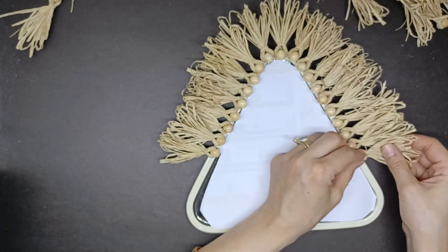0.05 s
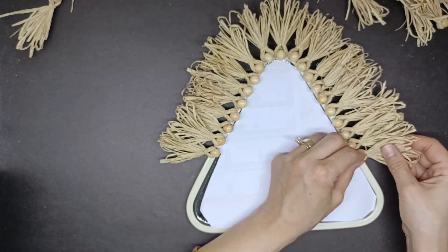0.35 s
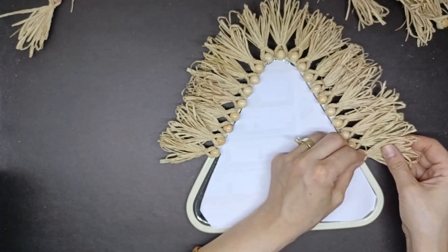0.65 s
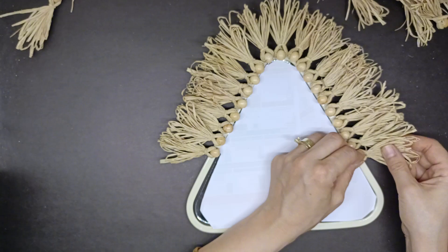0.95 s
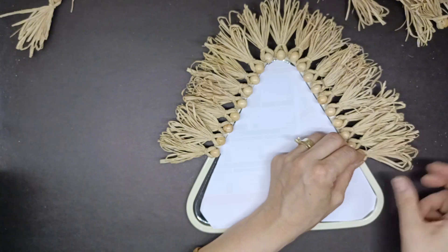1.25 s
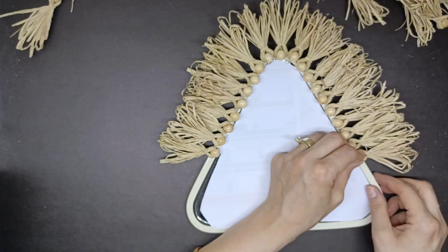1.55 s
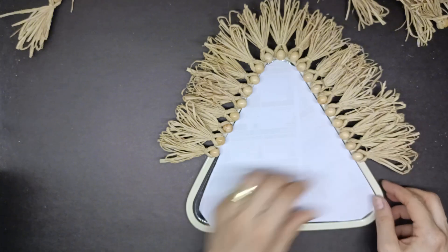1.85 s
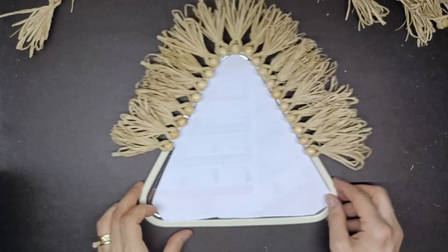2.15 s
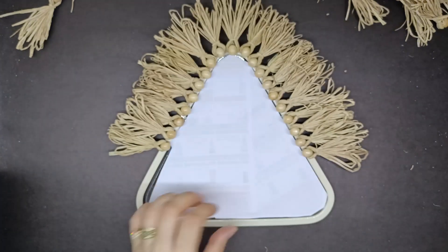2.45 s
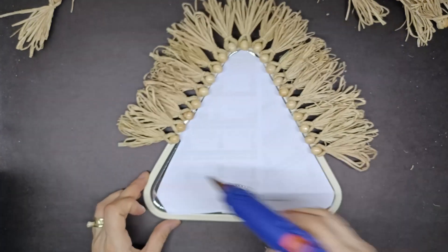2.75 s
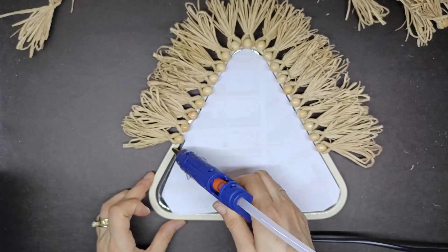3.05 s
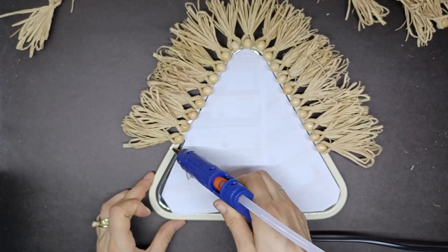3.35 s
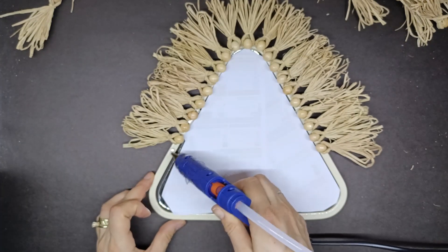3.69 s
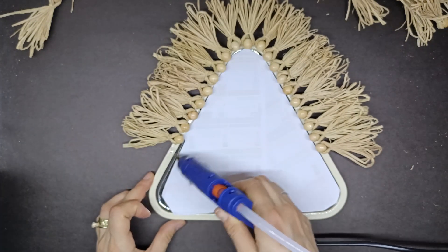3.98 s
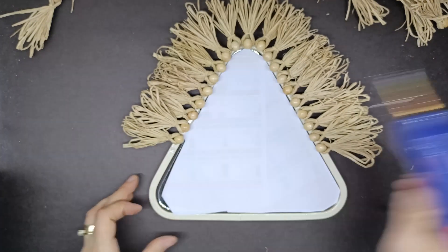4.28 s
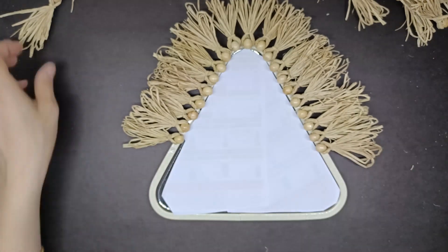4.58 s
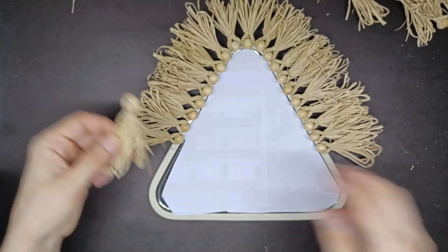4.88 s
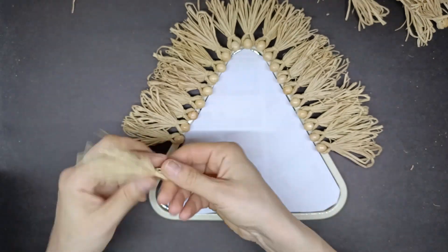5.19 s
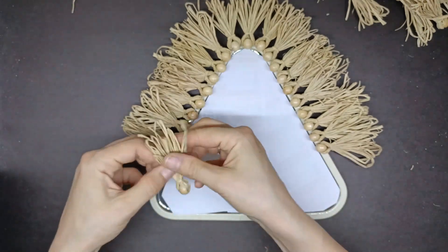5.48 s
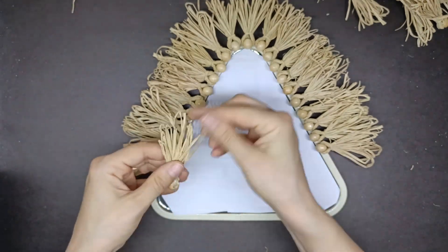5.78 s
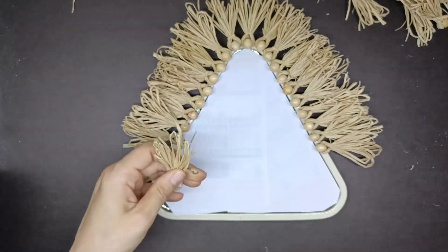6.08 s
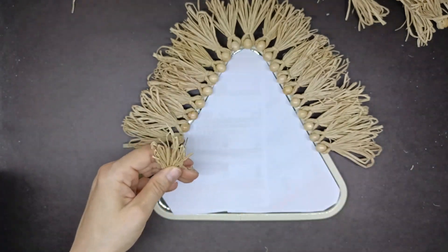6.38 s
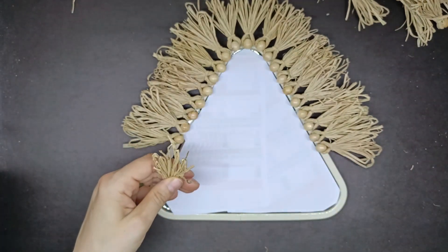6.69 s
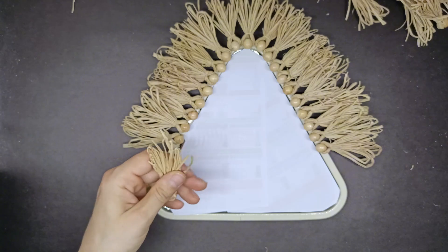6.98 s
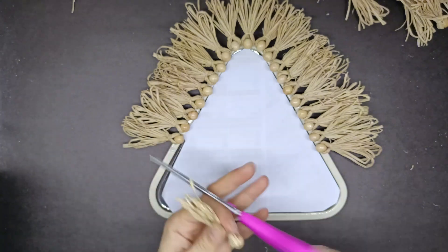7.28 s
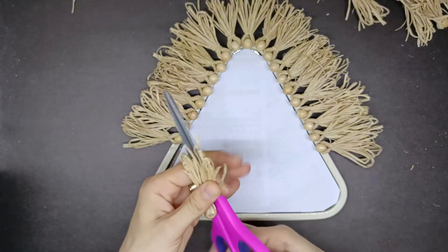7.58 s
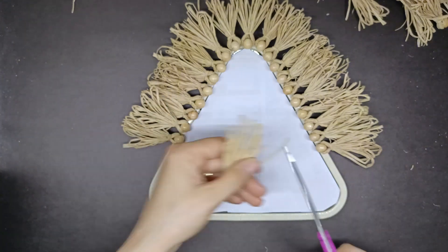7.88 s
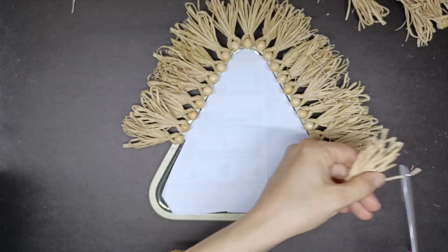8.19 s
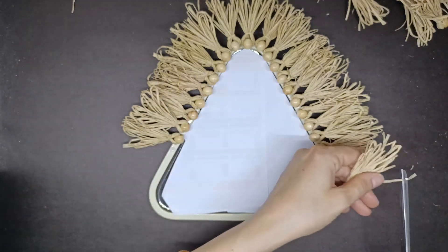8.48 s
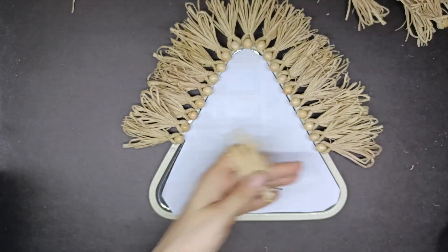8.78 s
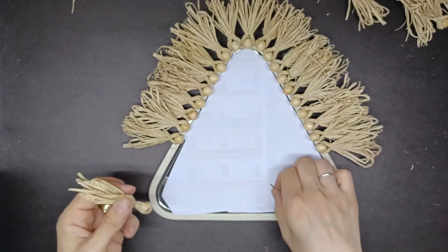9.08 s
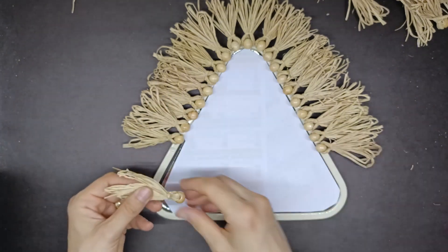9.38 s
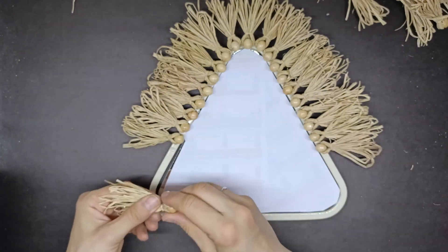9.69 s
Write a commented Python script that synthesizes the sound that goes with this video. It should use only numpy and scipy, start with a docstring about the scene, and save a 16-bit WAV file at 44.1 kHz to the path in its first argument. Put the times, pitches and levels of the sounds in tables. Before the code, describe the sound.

In a small, quiet room with a low rumble, raffia rustles briefly and a frame scrapes across a table. A glue gun is picked up with clicks and put down with a knock. Fingers then fluff a dry raffia tassel, with a crisp hiss and tiny snaps. Near the end scissors make one bright snip and land with a loud clatter, followed by more soft rustling. Everything sounds close.

```python
"""At a work table in a small, quiet room with a low rumble. Hands slide a frame, use a glue gun and
put it down, then fluff and trim a dry raffia tassel. The scissors land with a clatter near the end.
Fibres rub and snap in tiny grains; small hard parts click. Things dragged or dropped on the table
ring the modes of its top."""
import sys
import numpy as np
from scipy import signal
from scipy.fft import rfft, irfft
from scipy.io import wavfile

SR = 44100
rng = np.random.default_rng(int(sys.argv[2]) if len(sys.argv) > 2 else 0)


def put_to_file(sound):
    """Save the sound as 16-bit audio at rate SR, in the file named by the first command-line argument."""
    columns = np.atleast_2d(sound).T  # one column per channel
    safe = np.clip(columns, -1, 1)
    whole_steps = np.round(safe * 32767)
    wavfile.write(sys.argv[1], SR, whole_steps.astype(np.int16))


N = 434385
TIME_S = np.arange(N) / SR

# Single fibres snapping. Each row: time in seconds, level in dB.
FIBRE_SNAPS = [(0.235, -45.5), (0.247, -60), (0.406, -66), (0.7114, -59), (2.481, -65.5), (2.913, -46.5),
               (3.007, -49.5), (3.051, -54.5), (3.9054, -60), (4.8316, -41.5), (4.9277, -43.5),
               (5.049, -47), (5.2148, -41), (5.3282, -44), (5.3796, -56), (5.6952, -45.5), (5.767, -42.5),
               (6.0073, -44), (6.0685, -43), (6.136, -51), (6.2277, -46), (6.406, -53.5), (7.1032, -51.5),
               (7.1748, -53), (7.205, -48.5), (7.788, -49), (7.94, -58.5), (8.264, -67.5), (8.3198, -63),
               (8.372, -69), (8.7271, -44), (9.085, -61.5), (9.338, -45), (9.4659, -49.5), (9.8026, -46)]
# Glue gun, beads and scissors. Each row: start in seconds, level in dB, main resonance in Hz.
PART_CLICKS = [(0.357, -73, 3090), (2.0566, -46, 2950), (3.008, -66.5, 2300), (3.6058, -73.5, 1157),
               (3.807, -66, 1200), (3.958, -51.5, 1166), (4.118, -69.5, 1160), (4.166, -66.5, 2450),
               (4.7674, -47, 1560), (6.9054, -45.5, 1605), (7.431, -69, 2630), (7.8394, -69.5, 1176)]
# Small hard parts. Each row: multiple of the main resonance, level in dB, T60 in seconds.
PART_MODES = [(1, 8, 0.038), (2.06, -11, 0.097), (2.8, -15, 0.06), (3.7, -20, 0.046)]
# Fingers pushing through raffia. Each row: peak time, rise and fall in seconds, fibre hiss in dB,
# bundle rustle in dB re hiss.
RAFFIA_STROKES = [(1.22, 0.045, 0.091, -52.5, -4.5), (4.02, 0.077, .08, -74.5, -15),
                  (4.265, 0.012, 0.047, -73.5, 7.5), (4.79, 0.034, 0.064, -49, 2.5),
                  (4.838, 0.02, 0.046, -43, -5), (4.93, 0.054, 0.048, -53, -12.5),
                  (5.055, 0.095, 0.072, -62, -12.5), (5.148, 0.033, 0.04, -45, -18),
                  (5.3, 0.048, 0.062, -50.5, -13.5), (5.452, 0.046, 0.04, -45, -18),
                  (5.54, 0.051, 0.068, -43.5, -22), (5.62, 0.041, 0.057, -41, -18.5),
                  (5.655, 0.043, 0.023, -44.5, -7), (5.71, .04, 0.04, -48, -19.5),
                  (5.775, 0.041, 0.11, -50.5, -15.5), (5.87, 0.092, 0.047, -54, -12),
                  (6.04, 0.052, 0.085, -50, -11.5), (6.145, 0.038, 0.054, -58, -11),
                  (6.22, 0.039, 0.064, -56.5, -14), (6.3, .05, 0.11, -66, -6.5),
                  (7.045, 0.023, 0.039, -57, -17), (7.1, .04, 0.042, -61.5, -10),
                  (7.185, 0.061, 0.15, -67.5, 3), (7.428, 0.026, 0.028, -55, -3),
                  (7.6, 0.077, 0.043, -66.5, -12.5), (7.725, 0.037, 0.067, -64, -13),
                  (7.79, 0.045, 0.047, -64.5, -9.5), (7.845, 0.023, 0.022, -51, -6.5),
                  (8.77, .12, .14, -59, -16.5), (9.28, 0.1, 0.043, -55.5, -10.5),
                  (9.358, 0.031, 0.037, -47, -9), (9.42, 0.042, 0.029, -45, -19.5),
                  (9.53, 0.058, .08, -55, -11), (9.65, 0.085, 0.12, -50.5, -17),
                  (9.81, 0.033, 0.067, -52, -13)]
# Frame shoved, glue gun drawn off and pushed back, scissors picked up and laid down. Each row: peak
# time, rise and fall in seconds, scrape in dB, then board, panel and hiss in dB re scrape.
FRAME_STROKES = [(1.82, .035, 0.042, -79, 23.5, 2, 10), (1.87, 0.035, 0.019, -68, 4, -6, 0),
                 (1.98, .13, .17, -67.5, -3, -6.5, 5.5), (2.09, 0.059, .06, -52.5, 1.5, -13, -11),
                 (2.175, 0.13, 0.096, -42.5, -7, -13.5, -0.5), (2.235, 0.1, 0.057, -50.5, 5, -6, 1)]
GUN_STROKES = [(2.55, 0.018, .03, -53.5, -13, -8, -8), (2.585, .02, 0.027, -53.5, -6.5, -6, -5.5),
               (2.66, .035, .06, -50.5, -13, -5.5, -11), (2.72, 0.041, .08, -40.5, -25, -9, -15),
               (2.8, 0.089, .16, -51, -7.5, -3, -4), (2.89, 0.032, .08, -61, 5, 2.5, -2),
               (4.345, 0.044, .05, -54, 3.5, 4, -10.5), (4.385, 0.039, .06, -60.5, -0.5, -11, -8),
               (4.487, 0.045, .035, -49, 5.5, 2.5, -18), (4.56, .03, .05, -54, 5, -4.5, -7.5),
               (4.612, 0.057, .05, -51, -3.5, -9, -9.5), (4.65, 0.021, .045, -68.5, 17.5, 3, -27)]
SCISSOR_STROKES = [(6.41, .11, 0.11, -73, 5.5, 9, -4.5), (6.775, 0.05, 0.049, -78.5, 7.5, 14, -13),
                   (6.82, 0.029, .04, -53.5, -1.5, 2.5, -26), (6.86, 0.031, 0.046, -41.5, -24, -17.5, -6),
                   (6.915, 0.035, 0.074, -49, -15.5, -5.5, -11),
                   (8.872, .025, 0.045, -39.5, 2.5, -5.5, -3.5), (8.937, 0.028, 0.044, -37.5, 6.5, 7, -5),
                   (8.987, 0.018, .03, -41, 9, 5, -14.5), (9.05, 0.065, 0.067, -71, 13.5, 12, -13)]
# Resonances of the dragged objects. Each row: frequency in Hz, width in Hz, level in dB.
FRAME_BODY = [(1540, 45, -15), (2350, 210, 1.5), (3080, 210, 6), (3520, 150, 2), (3800, 73, 6),
              (4380, 150, 4.5), (5650, 670, -2)]
GUN_BODY = [(1140, 190, 1.5), (1360, 80, -5.5), (2080, 390, -3), (2430, 180, -1), (2910, 300, -4.5),
            (3080, 86, -6.5), (3700, 41, -4.5), (4180, 150, -4)]
SCISSOR_BODY = [(720, 120, -3.5), (1075, 130, 8), (1580, 110, 2.5), (2400, 200, 3.5), (2540, 110, -1.5),
                (2920, 120, -2.5), (3140, 87, -0.5), (3470, 44, -12.5), (4970, 1000, -14.5)]
# Blows on the table. Each row: start in seconds, then crack, table thud, board boom and panel ring
# in dB, bright tick in dB re crack, decay of crack and tick in seconds.
TABLE_KNOCKS = [(1.9026, -60, -73, -62, -65.5, -18, .006), (2.057, -47, -65, -45, -52.5, -25, 0.0015),
                (2.5743, -45, -59, -57, -71, -7, .007), (2.7018, -29, -55.5, -54, -66, -16, 0.0022),
                (2.7503, -38.5, -64, -65, -48.5, -4.5, 0.0062), (4.335, -47.5, -43.5, -64, -43, -35, 0.01),
                (4.4529, -44, -58, -39.5, -41, -30, .007), (4.499, -24, -53, -49, -41, -12, 0.0028),
                (4.5248, -28, -34, -29, -30, -8, 0.0064), (4.641, -59, -52, -63, -59.5, -23, 0.022),
                (6.3576, -54.5, -58.5, -62, -53, -11, 0.0044), (6.475, -59.5, -64, -72.5, -56, -12, 0.0069),
                (8.8655, -29.5, -59, -36, -40, -21, 0.013), (8.917, -18.5, -27, -22.5, -27, -7, 0.0042),
                (8.9339, -25.5, -41, -46, -23.5, -30, 0.0068),
                (8.977, -27.5, -37, -18.5, -18.5, -24, 0.0072), (9.125, -63, -57.5, -49, -72, 3, 0.018)]
# Modes of the whole table, its board and its panel. Each row: frequency in Hz, level in dB,
# T60 in seconds.
TABLE_MODES = [(92, -1, 0.15), (120, -5, .11), (141.7, 1, .11)]
BOARD_MODES = [(163, 2.5, 0.07), (181.6, 2.5, .1), (212.2, -11, .08)]
PANEL_MODES = [(345, -8, .06), (392, -5, .055), (440, -8, .05), (478, 0, .055), (530, -13, .05),
               (675, -8, .05), (830, -12, .045)]
# Noise spectra. Each row: frequency in Hz, relative density in dB.
ROOM_SPECTRUM = [(15, -19), (28, -2.5), (50, -5.5), (80, -6), (105, -16.5), (135, -13), (220, -18),
                 (310, -37.5), (430, -25.5), (620, -36), (1400, -43), (3000, -41.5), (8500, -50),
                 (16000, -48)]
FIBRE_SPECTRUM = [(2500, -30), (4200, -13), (6000, -6.5), (8800, -1), (10200, -2), (12000, 2), (16000, -5)]
BUNDLE_SPECTRUM = [(150, -14.5), (450, -3), (720, -10), (1100, -4), (1550, -9), (1900, -9.5), (2500, -0.5),
                   (3500, -5), (5000, -5), (8000, -12.5)]
SCRAPE_SPECTRUM = [(400, -24), (800, -9), (1050, -5), (1350, -2), (1600, -2.5), (1850, -8.5), (2150, -2.5),
                   (2800, 4.5), (3600, -4), (5000, -5.5), (7000, -13), (12000, -20.5)]
HISS_SPECTRUM = [(3000, -18.5), (5500, 2), (7500, -1.5), (9800, -3), (12000, -3), (16000, -13.5)]
CRACK_SPECTRUM = [(200, -14.5), (350, -3), (650, -2.5), (950, -2), (1300, -1), (1750, -8), (2700, 1.5),
                  (3600, -7), (5000, -8.5), (7500, -22.5), (14000, -34)]
SHEAR_SPECTRUM = [(150, -24), (420, -16), (720, -14.5), (950, -18.5), (1600, -24), (2900, -10.5),
                  (4200, -16.5), (5700, -8), (8400, -4.5), (10800, -1), (13000, -7.5), (16000, -9.5)]


def undb(db):
    """Decibels to gain."""
    return 10 ** (np.asarray(db) / 20)


def pan(db):
    """Stereo gains for a level of left re right."""
    return undb(np.array([[db], [-db]]) / 2)


def add(out, at_s, sound, centred=False):
    """Mix a sound in, starting or centred at at_s."""
    start = int(at_s * SR) - centred * (sound.shape[-1] // 2)
    out[:, start:start + sound.shape[-1]] += sound[..., :N - start]


def highpass(x, hz, order=2):
    """Butterworth high-pass."""
    return signal.sosfilt(signal.butter(order, hz, "high", fs=SR, output="sos"), x)


def convolve(x, response):
    """Stereo convolution, cut to N samples."""
    return signal.oaconvolve(x, response, axes=1)[:, :N]


def colour(x, spectrum, size=8192):
    """Minimum-phase filter with the given spectrum; white noise keeps its power."""
    hz, db = np.transpose(spectrum)
    bins_hz = np.maximum(np.arange(size // 2 + 1) * SR / size, 1)
    gain = undb(np.interp(np.log(bins_hz), np.log(hz), db))
    cepstrum = irfft(np.log(gain))
    cepstrum[1:size // 2] *= 2
    cepstrum[size // 2 + 1:] = 0
    response = irfft(np.exp(rfft(cepstrum)))[:size // 2]
    return convolve(x, response[None] / np.linalg.norm(response))


def stereo_noise(shared_hz):
    """Noise at two microphones: alike for long waves, unrelated for short ones."""
    mid, side = rng.standard_normal((2, N))
    side = highpass(side, shared_hz)
    return np.array([mid + side, mid - side]) / np.sqrt(2)


def room_tone(level_db=-65):
    """Steady low rumble with faint hiss."""
    rumble = colour(stereo_noise(shared_hz=264), ROOM_SPECTRUM)
    return rumble / rumble.std() * undb(level_db)


def burst(rise_s, fall_s, size=8192):
    """One contact, centred in its array: a light brush, then noise that rises fast and dies away."""
    t = TIME_S[:size] - TIME_S[size // 2]
    after_s = np.maximum(t, 0)
    envelope = (1 - np.exp(-after_s / rise_s)) * np.exp(-after_s / max(fall_s, .001))
    brush = undb(-18) * np.exp(-np.abs(t) / .008)
    return (envelope / envelope.max() + brush) * rng.standard_normal((2, size))


def fibre_snaps(strays_per_s=4, stray_db=-65, stray_fall_s=.002):
    """Stiff fibres flick free one at a time; bent ones settle at random with faint ticks."""
    snaps = np.zeros((2, N))
    for at_s, db in FIBRE_SNAPS:
        add(snaps, at_s, undb(db) * burst(rise_s=.001, fall_s=.003), centred=True)
    settling = rng.random(N) < strays_per_s / SR
    spread_db = np.clip(rng.standard_normal(N), -2, 2)
    impulses = settling * undb(stray_db + spread_db)
    envelope = signal.lfilter([1], [1, -np.exp(-1 / (stray_fall_s * SR))], impulses + 1e-18)
    strays = envelope * rng.standard_normal((2, N))
    return colour(snaps + strays, FIBRE_SPECTRUM) * pan(-1.2)


def ring(modes, push_s, detune, apart_hz, size=12000):
    """Damped modes after a push; higher ones reach the two microphones out of step."""
    t, out = TIME_S[:size], 0
    for k, (hz, db, t60_s) in enumerate(modes):
        lag_rad = (-1) ** k * min(hz / apart_hz, 1) * np.array([[1], [-1]])
        phase = 2 * np.pi * hz * (1 + detune * rng.standard_normal()) * t + lag_rad
        out = out + undb(db) * np.exp(-np.log(1000) * t / t60_s) * np.sin(phase)
    out = out * (1 - np.exp(-t / push_s))
    onset_rms = np.sqrt(np.mean(out[:, :size // 20] ** 2))
    return out / onset_rms


def part_clicks():
    """Small hard parts meet with a tick and ring briefly."""
    tone, tick = np.zeros((2, 2, N))
    for at_s, db, hz in PART_CLICKS:
        modes = [(hz * ratio, mode_db, t60_s) for ratio, mode_db, t60_s in PART_MODES]
        add(tone, at_s, undb(db) * ring(modes, push_s=.0018, detune=.0091, apart_hz=2400))
        add(tick, at_s, undb(db + 6) * burst(rise_s=.002, fall_s=.0052), centred=True)
    return tone + colour(tick, SCRAPE_SPECTRUM) + undb(-13) * colour(tick, HISS_SPECTRUM)


def grains(per_s, spread_db, grain_s):
    """Tiny slips of random size, each a brief burst of noise; rms 1."""
    slipping, spread = rng.random(N) < per_s / SR, rng.standard_normal(N)
    sizes = slipping * undb(spread_db * np.clip(spread, -2, 2))
    power = signal.lfilter([1], [1, -np.exp(-2 / (grain_s * SR))], sizes ** 2 + 1e-12)
    return np.sqrt(power / power.mean()) * rng.standard_normal((2, N))


def stroke_gain(strokes, roundness, layer=None, swell_db=21):
    """Each push speeds up and slows in one swell (roundness 2: bell); layer picks a relative dB column."""
    power = np.zeros(N)
    for peak_s, rise_s, fall_s, db, *layers_db in strokes:
        span = slice(*np.searchsorted(TIME_S, [peak_s - 2 * rise_s, peak_s + 2 * fall_s]))
        off_peak = np.maximum((peak_s - TIME_S[span]) / rise_s, (TIME_S[span] - peak_s) / fall_s)
        peak_db = db + (0 if layer is None else layers_db[layer])
        power[span] += undb(peak_db - swell_db * off_peak ** roundness) ** 2
    return np.sqrt(power)


def raffia_rustle(roundness=2.33):
    """Dry fibres slip densely over each other, a few crackle; the squeezed bundle rustles lower."""
    slips = grains(per_s=2500, spread_db=4.2, grain_s=.0013)
    crackle = undb(-6) * grains(per_s=100, spread_db=3.5, grain_s=.0012)
    creases = grains(per_s=2500, spread_db=3, grain_s=.002)
    fibres = slips + crackle
    hiss = colour(fibres / fibres.std(), FIBRE_SPECTRUM) * stroke_gain(RAFFIA_STROKES, roundness)
    bundle = colour(creases, BUNDLE_SPECTRUM) * stroke_gain(RAFFIA_STROKES, roundness, layer=0)
    return hiss * pan(-2) + bundle * pan(-1.9)


def rubbed_modes(modes, shared_hz):
    """Modes kept ringing by friction; rms 1."""
    response = ring(modes, push_s=.0029, detune=.0077, apart_hz=5000)
    out = convolve(stereo_noise(shared_hz), response)
    return out / out.std()


def resonate(x, body):
    """Parallel resonances of an object; white noise keeps its power."""
    t = TIME_S[:2048]
    response = sum(undb(db) * width_hz * np.exp(-np.pi * width_hz * t) * np.cos(2 * np.pi * hz * t)
                   for hz, width_hz, db in body)
    response = highpass(response, hz=600)
    return convolve(x, response[None] / np.linalg.norm(response))


def drags(roundness=1.98):
    """Frame, glue gun and scissors catch and slip on the table, ringing and shaking its top."""
    slips = grains(per_s=900, spread_db=3.5, grain_s=.002)
    grit = colour(grains(per_s=1500, spread_db=3, grain_s=.0018), SCRAPE_SPECTRUM)
    hiss = colour(grains(per_s=2600, spread_db=2.5, grain_s=.0019), HISS_SPECTRUM)
    board = rubbed_modes(BOARD_MODES, shared_hz=300)
    panel = rubbed_modes(PANEL_MODES, shared_hz=345)

    def drag(strokes, body, body_db, grit_db, pan_db):
        """One object sliding."""
        scrape = undb(body_db) * resonate(slips, body) + undb(grit_db) * grit
        table = sum(sound * stroke_gain(strokes, roundness, layer=k)
                    for k, sound in enumerate([board, panel, hiss]))
        return (scrape * stroke_gain(strokes, roundness) + table) * pan(pan_db)

    return (drag(FRAME_STROKES, FRAME_BODY, body_db=-.5, grit_db=-1, pan_db=-1)
            + drag(GUN_STROKES, GUN_BODY, body_db=.5, grit_db=-1.5, pan_db=-1.2)
            + drag(SCISSOR_STROKES, SCISSOR_BODY, body_db=2.5, grit_db=-8.5, pan_db=-2.5))


def table_knocks():
    """Each blow cracks at the contact and rings the top; heavy ones move the whole table."""
    wood, crack, tick = np.zeros((3, 2, N))
    for at_s, crack_db, thud_db, board_db, panel_db, tick_db, fall_s in TABLE_KNOCKS:
        add(wood, at_s, undb(thud_db) * ring(TABLE_MODES, push_s=.0082, detune=.003, apart_hz=2500))
        add(wood, at_s, undb(board_db) * ring(BOARD_MODES, push_s=.0014, detune=.003, apart_hz=2000))
        add(wood, at_s, undb(panel_db) * ring(PANEL_MODES, push_s=.0079, detune=.0027, apart_hz=1130))
        add(crack, at_s, undb(crack_db) * burst(rise_s=.0042, fall_s=fall_s), centred=True)
        add(tick, at_s, undb(crack_db + tick_db) * burst(rise_s=.00093, fall_s=fall_s), centred=True)
    wood = highpass(wood, hz=72, order=4)
    return (wood + colour(crack, CRACK_SPECTRUM) + colour(tick, HISS_SPECTRUM)) * pan(-.18)


def strand_shear(peak_s=8.647, level_db=-25, width_s=.01, skirt_db=-20, skirt_s=.018):
    """A stray strand is sheared and whisked away: a quick bright swish."""
    swish = np.exp(-.5 * ((TIME_S - peak_s) / width_s) ** 2)
    skirt = undb(skirt_db) * np.exp(-.5 * ((TIME_S - peak_s) / skirt_s) ** 2)
    slips = grains(per_s=4300, spread_db=2, grain_s=.0024)
    return colour(slips, SHEAR_SPECTRUM) * (swish + skirt) * undb(level_db) * pan(-1.1)


def near_echoes(x, echo_db=-3, fade_s=.006, above_hz=700, size=1500):
    """Table top and things close by return short waves within milliseconds, rippling the spectrum."""
    echoes = rng.standard_normal((2, size)) * np.exp(-TIME_S[:size] / fade_s)
    echoes = highpass(echoes, above_hz)
    echoes *= undb(echo_db) / np.linalg.norm(echoes, axis=1, keepdims=True)
    return (x + convolve(x, echoes)) / np.hypot(1, undb(echo_db))


def room_reverb(x, wet_db=-25, t60_s=.23, build_s=.0079, damp_hz=7000, size=16000):
    """Short, slightly dull reflections of a furnished room."""
    t = TIME_S[:size]
    envelope = np.exp(-np.log(1000) * t / t60_s) * (1 - np.exp(-t / build_s))
    tail = rng.standard_normal((2, size)) * envelope
    tail = signal.sosfilt(signal.butter(1, damp_hz, fs=SR, output="sos"), tail)
    return x + undb(wet_db) * convolve(x, tail / np.linalg.norm(tail[0]))


def scene():
    """All the handling, heard in the room."""
    handling = raffia_rustle() + fibre_snaps() + strand_shear() + drags() + table_knocks() + part_clicks()
    return room_reverb(near_echoes(handling)) + room_tone()


def record(dry):
    """The recorder cuts the top with a steep low-pass."""
    cutoff_hz = 15900
    return signal.sosfilt(signal.ellip(10, .2, 70, cutoff_hz, fs=SR, output="sos"), dry)


dry = scene()
out = record(dry)
put_to_file(out)
```